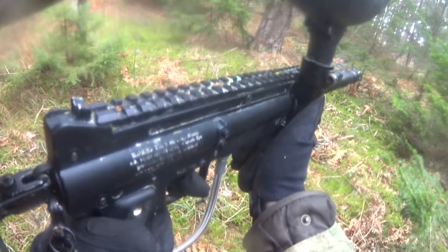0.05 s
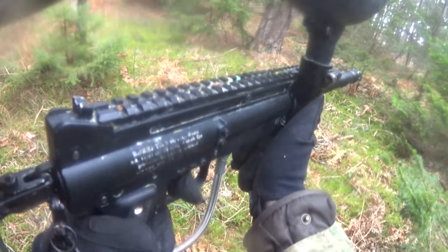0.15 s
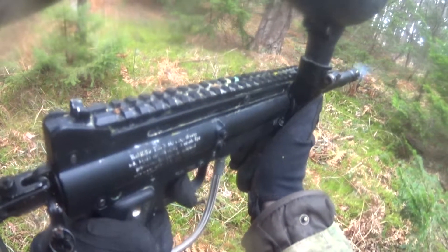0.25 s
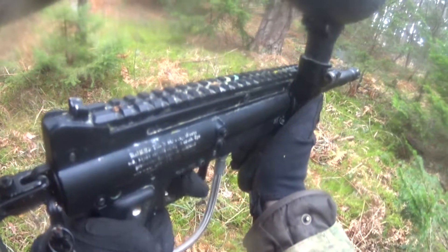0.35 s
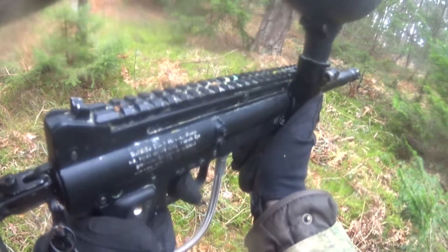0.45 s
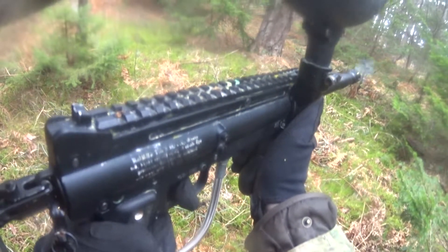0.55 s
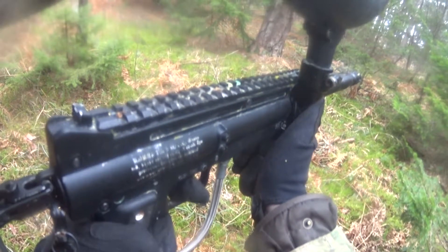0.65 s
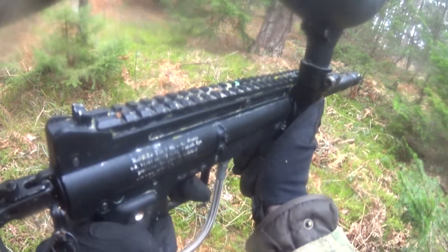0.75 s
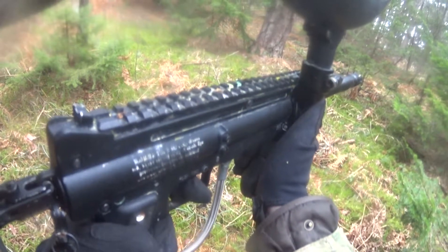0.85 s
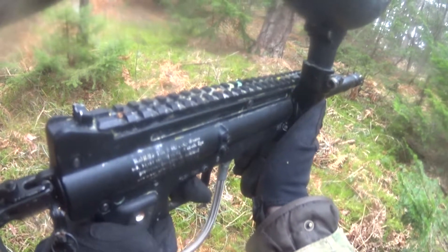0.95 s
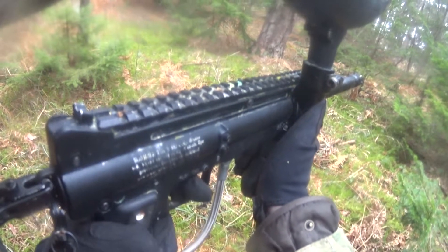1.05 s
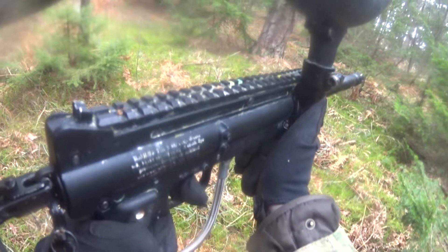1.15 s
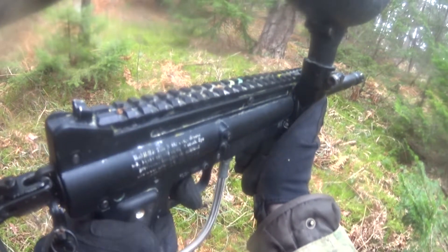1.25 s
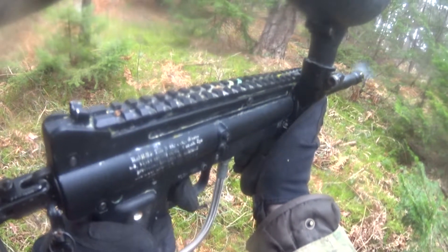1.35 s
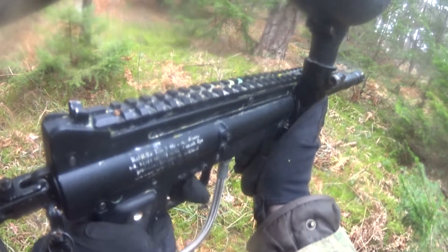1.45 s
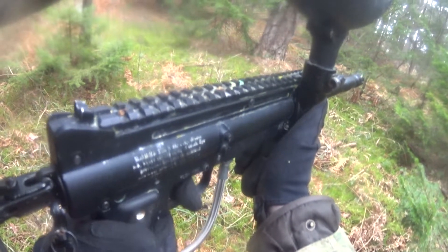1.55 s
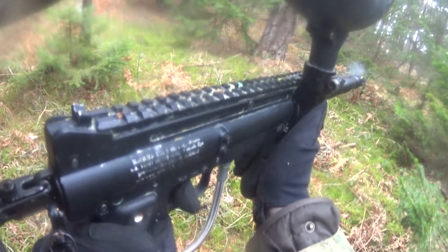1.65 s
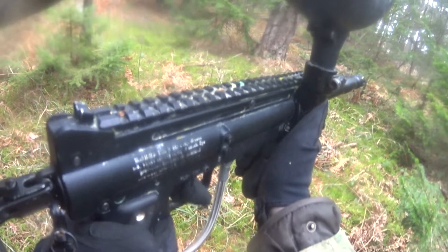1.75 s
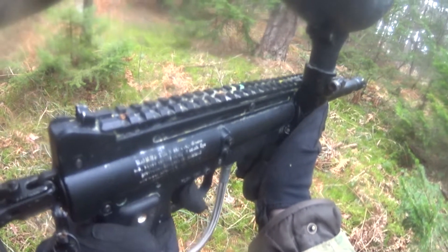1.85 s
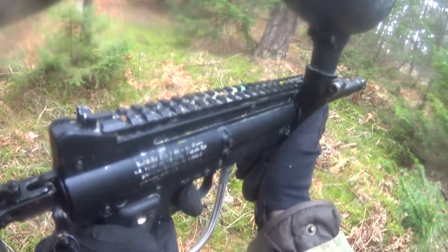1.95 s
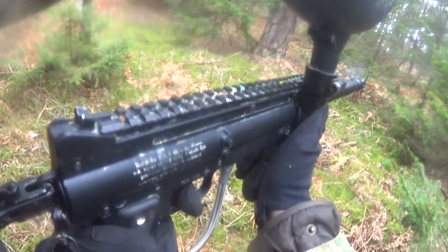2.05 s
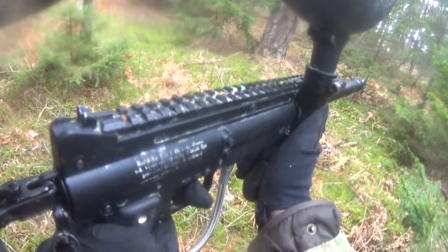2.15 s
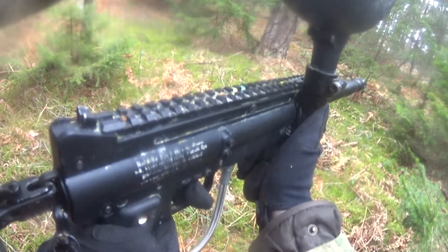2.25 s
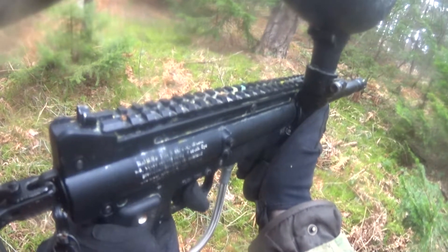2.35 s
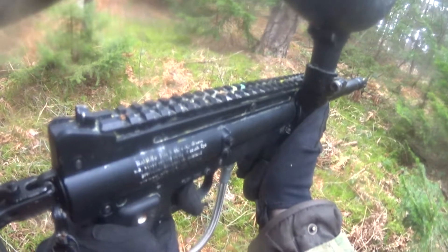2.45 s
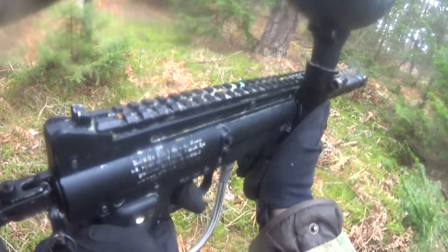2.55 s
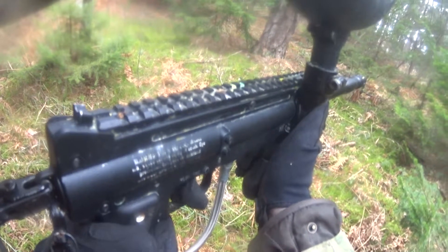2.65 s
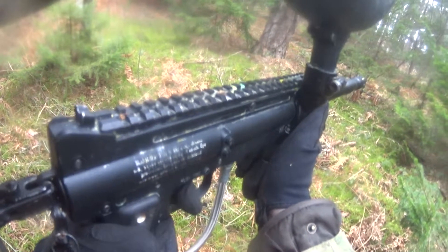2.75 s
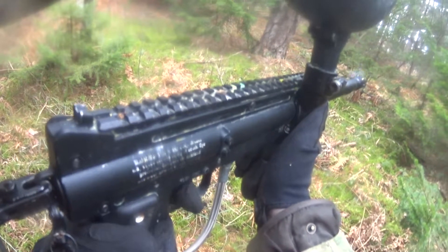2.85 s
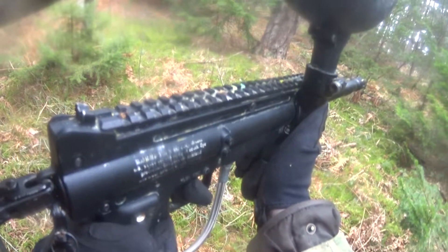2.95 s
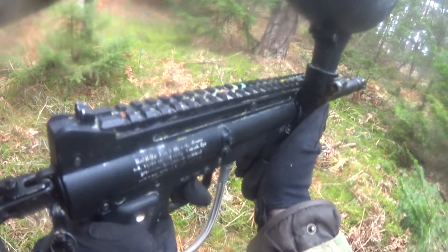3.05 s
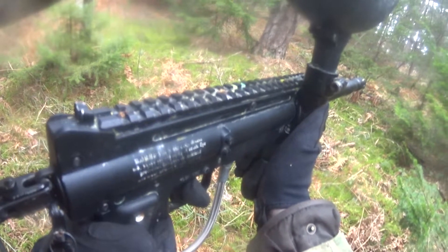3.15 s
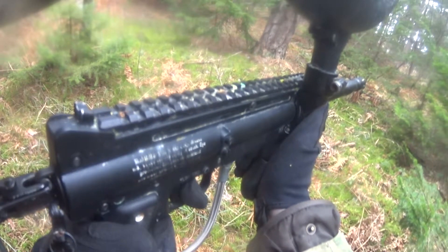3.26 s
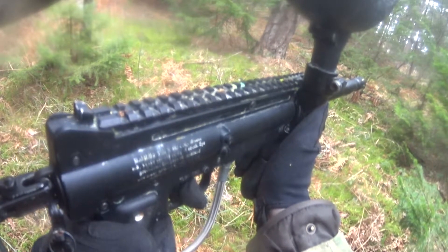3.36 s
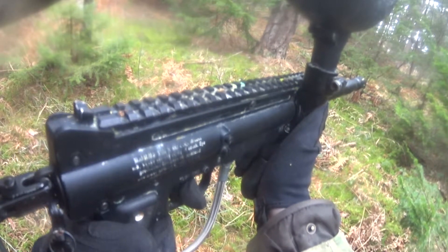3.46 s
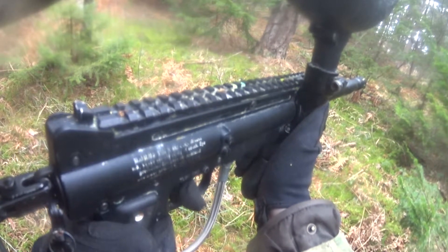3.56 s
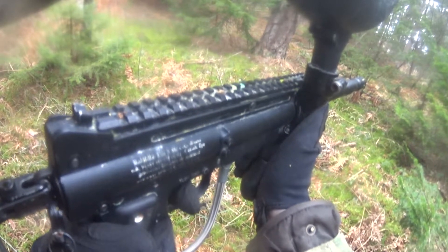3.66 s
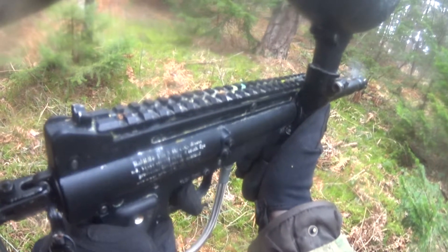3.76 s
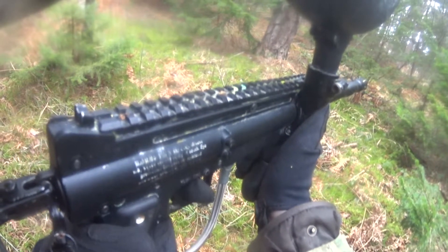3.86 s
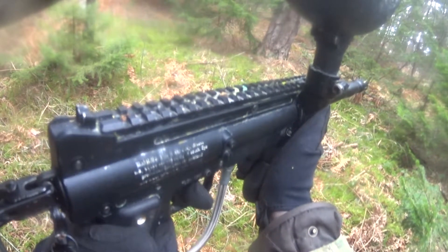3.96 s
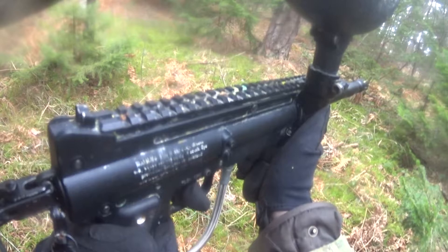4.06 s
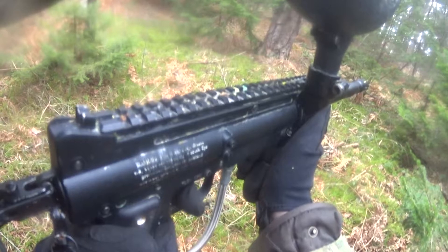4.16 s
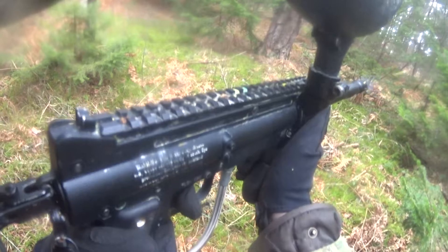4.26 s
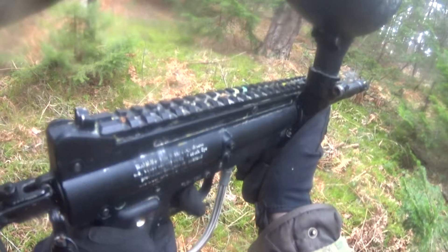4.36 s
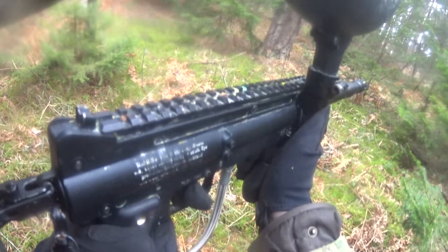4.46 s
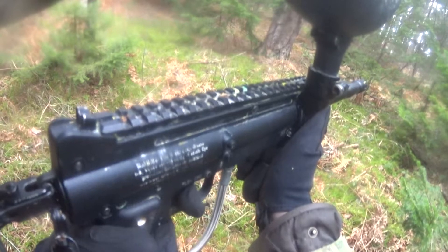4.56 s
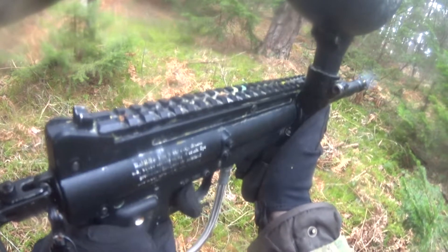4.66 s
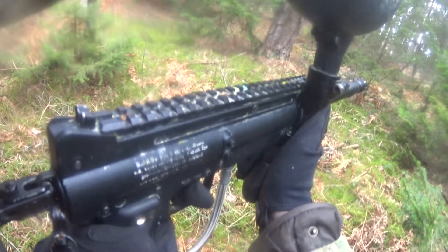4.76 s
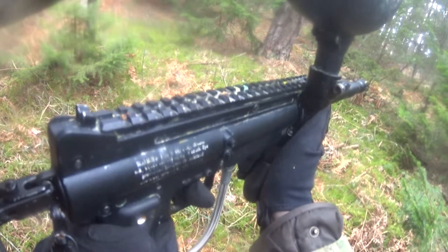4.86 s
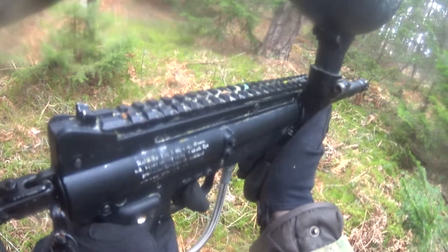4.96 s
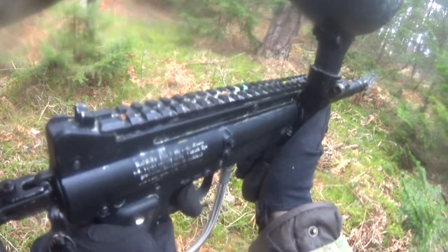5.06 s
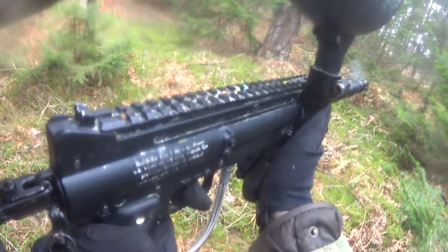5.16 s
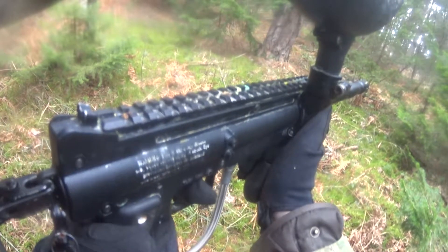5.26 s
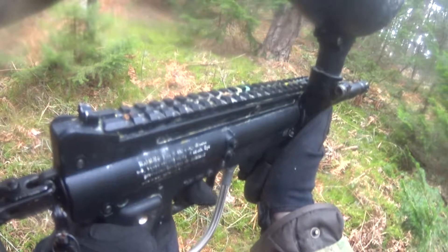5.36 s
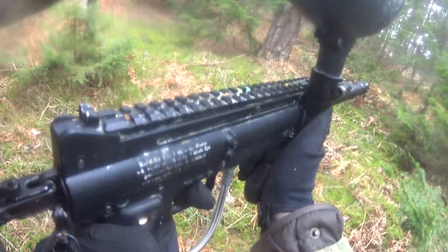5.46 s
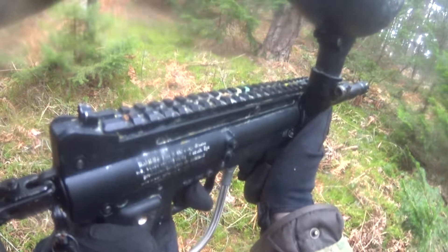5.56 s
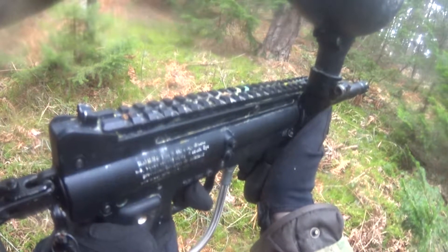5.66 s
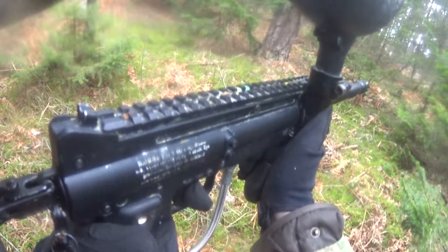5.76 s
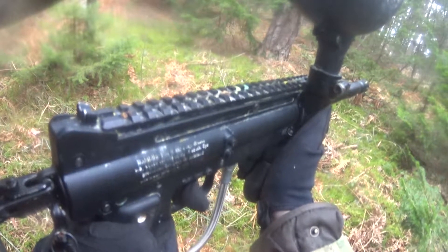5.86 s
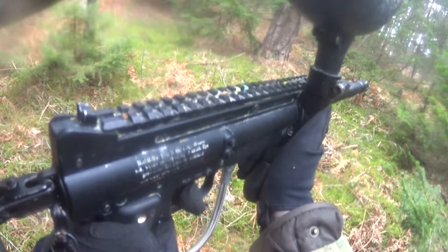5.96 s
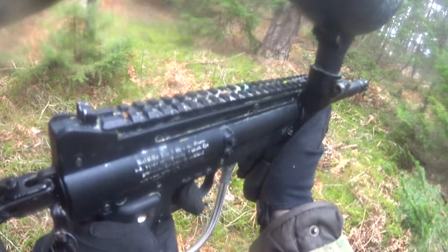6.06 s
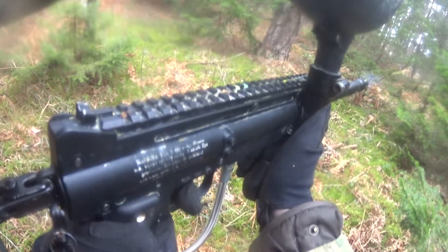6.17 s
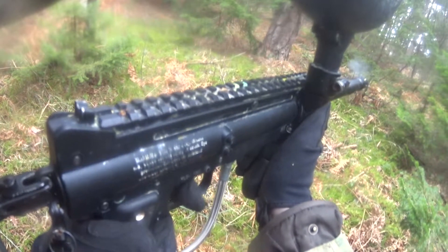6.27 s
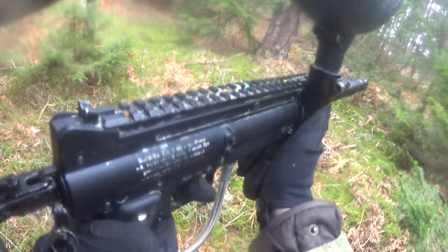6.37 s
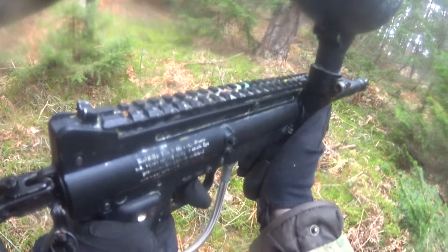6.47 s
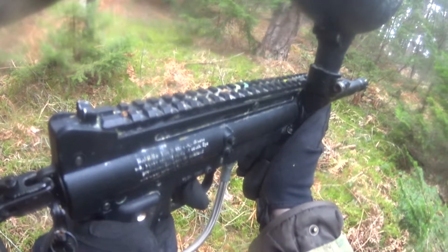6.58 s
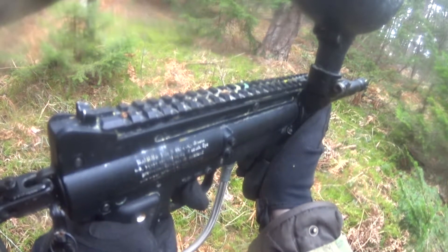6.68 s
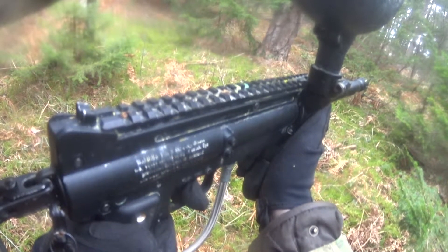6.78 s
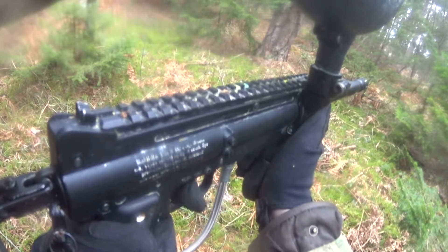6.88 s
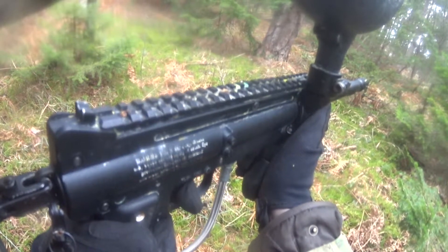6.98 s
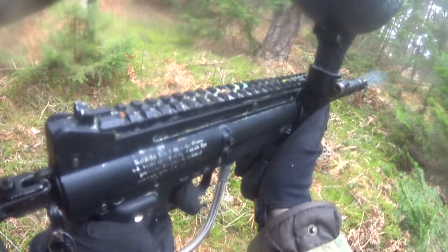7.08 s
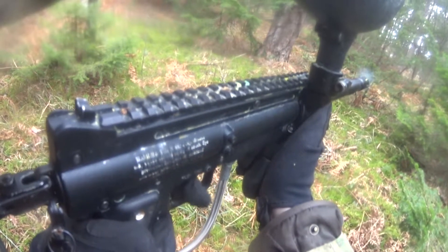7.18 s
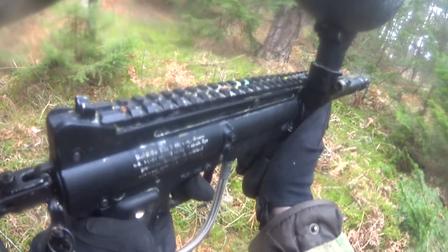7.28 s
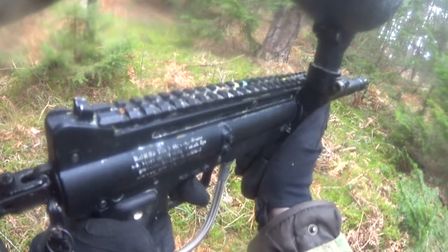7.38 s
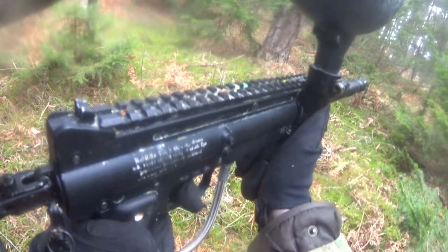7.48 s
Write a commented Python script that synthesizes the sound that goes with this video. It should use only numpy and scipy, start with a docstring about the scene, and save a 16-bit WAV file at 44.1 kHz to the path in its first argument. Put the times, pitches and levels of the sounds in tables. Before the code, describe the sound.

A paintball marker pops single shots right at the microphone, trigger snapping back, over distant rapid fire, paint smacks on trees and woodland echoes.

```python
"""Paintball marker in a forest

A marker is fired shot by shot right under a camera in a plastic housing: noise bursts for hammer, gas and
bolt, damped modes for struck parts and the booming housing; balls tumble in the feeder, the trigger snaps back.
A second marker some way off fires runs at 15 balls a second; paint smacks on trees, random-tap echoes
stand for the trunks, and coloured noise for the hush of the forest."""
import sys
import numpy as np
from scipy import signal
from scipy.fft import rfft, irfft
from scipy.io import wavfile

SR = 44100
rng = np.random.default_rng(int(sys.argv[2]) if len(sys.argv) > 2 else 0)


def bounce(signal):
    """Save signal as a 16-bit WAV file at the path given by the first command-line argument."""
    frames = np.transpose(np.atleast_2d(signal))
    limited = np.clip(frames, -1, 1)
    pcm = np.round(limited * 32767).astype(np.int16)
    wavfile.write(sys.argv[1], SR, pcm)


N = 331632

# shots of the near marker: start_s, strength_db, extra_gas_db
SHOTS = [(-.045, -9.5, 1.5), (0.2801, -12, -1), (0.5845, -13, -1), (1.3741, -12.5, 0), (1.6501, -13.5, .5),
         (2.0254, -11.5, -2), (2.5072, -13, 1), (2.8382, -12.5, 0.5), (3.716, -12.5, 2),
         (4.2953, -12, -0.5), (4.668, -11.5, 0.5), (5.0933, -11.5, 0.5), (6.2142, -12, 0.5),
         (7.1017, -11.5, 0)]
# trigger snapping back after each shot: start_s, level_db
RESETS = [(0.099, -8), (0.3969, -6.5), (0.7281, -7.5), (1.5248, -7), (1.775, -7.5), (2.1912, -6.5),
          (2.6586, -5.5), (2.97, -8), (3.873, -6.5), (4.4603, -6.5), (4.807, -6.5), (5.2457, -5),
          (6.3891, -4.5), (7.2715, -4)]
# colour of venting gas and of the far crack: freq_hz, density_db (per Hz, relative)
CRACK = [(60, -13.5), (600, 6), (950, -5), (2300, 3.5), (3500, -5), (5000, 1.5), (6700, -5.5), (10000, -14),
         (16000, -19.5)]
# colour of paint smacks and hard edges: freq_hz, density_db (per Hz, relative)
SMACK = [(100, -19.5), (650, -13.5), (1100, -16), (1900, 5), (3300, 3), (4500, 0.5), (6500, -1.5),
         (9000, -8), (16000, -22.5)]
# the two microphone ports: freq_hz, likeness (0-1), right_lag_rad, left_over_right_db
PORTS = [(100, 1, -1, -0.5), (350, .97, 0, -0.5), (704, 1, 0, 0.5), (1100, 0.73, 0, 3.5),
         (1500, 0.92, 0.2, 0.5), (2010, 0.99, -0.8, 0.7), (2580, 0.58, 1.5, 6), (3160, 0, -0.5, -1),
         (3850, 0.46, 0.46, 0), (4700, 1, 0.5, 1.5), (6600, 0.29, 0, 3), (8270, 0.33, -3, 2),
         (12100, 0.77, -2, -0.5)]


def amp(db):
    """Decibels to amplitude factor."""
    return 10 ** (np.asarray(db) / 20)


def evened(x):
    """Scales to rms 1."""
    return x / np.sqrt(np.mean(x ** 2) + 1e-20)


def read(table, hz, axis=1):
    """Interpolates one column of a table along log frequency."""
    columns = np.transpose(table)
    return np.interp(np.log(hz + 1), np.log(columns[0] + 1), columns[axis])


def add(mix, start_s, sound):
    """Adds a sound to the mix, cut off at both ends of the mix."""
    at = round(start_s * SR)
    sound = sound[..., max(-at, 0):]
    part = mix[:, max(at, 0):][:, :sound.shape[-1]]
    part += sound[..., :part.shape[1]]


def ports(a, b):
    """Blends two like sounds by band likeness, with the phase lag and level offset between the ports."""
    hz = np.fft.rfftfreq(len(a), 1 / SR)
    likeness = np.clip(read(PORTS, hz), 0, 1)
    side = amp(read(PORTS, hz, axis=3) / 2)
    lag = np.exp(-1j * read(PORTS, hz, axis=2))
    left = rfft(a)
    right = (likeness * left + np.sqrt(1 - likeness ** 2) * 1j * rfft(b)) * lag
    return irfft(np.array([left * side, right / side]), len(a))


def noise(colour, size):
    """Coloured stereo noise of rms 1."""
    white = ports(*rng.standard_normal((2, size)))
    gain = amp(read(colour, np.fft.rfftfreq(size, 1 / SR)))
    return evened(irfft(rfft(white) * gain, size))


def burst(colour, rise_s, hold_s, t60_s, tilt_db_oct=0, size=4096):
    """A rush of noise: linear rise, decay after the hold; the tilt brightens it per octave."""
    t = np.arange(size) / SR
    tilted = [(hz, db + tilt_db_oct * np.log2(hz)) for hz, db in colour]
    decay = amp(-60 * np.maximum(t - hold_s, 0) / t60_s)
    return noise(tilted, size) * np.minimum(t / rise_s, 1) * decay


def ring(modes, spread, size=3072):
    """Damped modes after one blow, with a relative frequency spread from blow to blow."""
    t = np.arange(size) / SR
    out = np.zeros(size)
    for hz, db, t60_s in modes:
        detuned_hz = hz * (1 + spread * rng.standard_normal())
        out += amp(db - 60 * t / t60_s) * np.sin(2 * np.pi * detuned_hz * t)
    return out


def struck(modes, spread, size=4096):
    """Damped modes of a struck hard part; where the blow lands sets each mode's sign, drawn by chance."""
    hz, db, t60_s = np.transpose(modes)[:, :, None]
    t = np.arange(size) / SR
    detuned_hz = hz * (1 + spread * rng.standard_normal(hz.shape))
    tones = amp(db - 60 * t / t60_s) * np.sin(2 * np.pi * detuned_hz * t)
    signs = rng.choice([-1, 1], (2, len(hz)))
    return ports(*signs @ tones) * np.linspace(1, 0, size)


def boom(modes, push_s, spread, size=256):
    """A push of air and the suction behind it excite booming modes."""
    u = np.minimum(np.arange(size) / (push_s * SR), 1)
    push = np.sin(2 * np.pi * u) * np.sin(np.pi * u)
    return np.convolve(ring(modes, spread), push / abs(push).sum())


def sputter(x, depth_db, grain_s):
    """Gas leaves in uneven spurts: a random level, interpolated between grains."""
    t = np.arange(x.shape[-1]) / SR
    level_db = depth_db * np.interp(t / grain_s, np.arange(256), rng.standard_normal(256))
    return x * evened(amp(level_db))


def marker():
    """Hammer, bolt slide, gas at the muzzle, thump and rebound, recocking, then a hiss of venting gas."""
    # colours of the hammer and the gas: freq_hz, density_db (per Hz, relative)
    hammer_colour = [(60, -30), (300, -15), (600, 3.5), (950, -31), (1400, -11), (1800, -11), (3000, -1),
                     (6000, 1), (9000, 0.5), (12000, -6), (16000, -13.5)]
    gas_colour = [(60, -16.5), (600, 12), (950, -8), (1700, 5), (3200, 1), (5500, 1), (9000, -1.5),
                  (11000, 2.5), (16000, -8)]
    # short steel clack of the hammer: freq_hz, level_db, t60_s
    clack_modes = [(1733, -13, 0.08), (2370, -8, 0.052), (3510, 0.5, 0.025), (4330, -17, 0.024),
                   (4700, -1, 0.012), (4930, -1, 0.014), (5590, 1, 0.017), (6330, 7, 0.0083),
                   (6770, -2, 0.0081), (10630, 7.5, 0.014), (14800, -1, .018)]
    # metal receiver ringing on after the bolt slams home: freq_hz, level_db, t60_s
    receiver_modes = [(1087, -5.5, 0.26), (1148, -13.5, 0.43), (1320, -18, 0.13), (1672, 0.5, 0.113),
                      (2250, 6, 0.032), (2864, 4.5, 0.1), (3030, -5.5, 0.41), (3458, 6, 0.046),
                      (4330, 5.5, 0.057), (4430, 0.5, 0.035), (5650, -21, 0.049), (7530, -1, 0.2)]
    # camera housing booming from the muzzle's push: freq_hz, level_db, t60_s
    housing_modes = [(157, -5.5, 0.04), (225, -9, 0.034), (375, -17, 0.045), (450, -7.5, 0.033),
                     (616, -10.5, 0.025), (683, -1, 0.036), (736, -5.5, 0.027)]
    # delays after the hammer falls
    slide_s, gas_s, thump_s, rebound_s, recock_s, vent_s = .008, .0192, .0218, .0262, .0345, .042
    # levels against the shot's strength
    hammer_db, clack_db, slide_db, gas_db, thump_db = -4, -7, -13.5, -2.5, 5
    rebound_db, recock_db, receiver_db, vent_db = -5, -2.5, -16.5, -16
    out = np.zeros((2, N))
    for s, db, extra_db in SHOTS:
        hammer = burst(hammer_colour, rise_s=0.00063, hold_s=0.0043, t60_s=0.015)
        add(out, s, amp(db + hammer_db) * hammer)
        add(out, s + .0003, amp(db + clack_db) * struck(clack_modes, spread=0.014))
        slide = burst(gas_colour, rise_s=0.0045, hold_s=0.0094, t60_s=0.042)
        add(out, s + slide_s, amp(db + slide_db) * slide)  # the bolt slides forward
        gas = burst(gas_colour, rise_s=0.0019, hold_s=0.0078, t60_s=0.061)
        gas = sputter(gas, depth_db=2.5, grain_s=0.001507)
        add(out, s + gas_s, amp(db + extra_db + gas_db) * gas)
        thump = -boom(housing_modes, push_s=0.0024, spread=0.0094)
        add(out, s + thump_s, amp(db + thump_db) * thump)
        add(out, s + rebound_s, amp(db + rebound_db) * thump)  # thrown back by the shooter's body
        recock_at = s + recock_s + .0005 * rng.standard_normal()
        recock = burst(hammer_colour, rise_s=0.00027, hold_s=0.0019, t60_s=0.014)
        add(out, recock_at, amp(db + recock_db) * recock)
        add(out, recock_at, amp(db + receiver_db) * struck(receiver_modes, spread=0.0035, size=8192))
        vent = burst(CRACK, rise_s=0.017, hold_s=0.024, t60_s=0.24, size=12000)
        vent = sputter(vent, depth_db=4.5, grain_s=0.0034)
        add(out, s + vent_s, amp(db + extra_db + vent_db) * vent)
    return out


def air():
    """The hush of the forest, hollow in the housing: coloured noise of slowly changing level."""
    # colour of the hush: freq_hz, density_db (per Hz, relative)
    air_colour = [(15, -46.5), (25, -24.5), (175, -15), (195, -13.5), (326, -13), (439, -12.5), (516, -5.5),
                  (790, -9), (911, -28.5), (1290, -21), (2610, -27), (6210, -37), (6920, -30.5),
                  (7920, -39), (16000, -41)]
    # level of the hush: time_s, level_db
    air_levels = [(4.5, -45), (5.3, -44), (5.9, -46), (6.9, -43.5), (7.5, -46.5)]
    level_db = np.interp(np.arange(N) / SR, *np.transpose(air_levels))
    return noise(air_colour, N) * amp(level_db)


def scatter(x, bands, onset_s, per_s, size=65536):
    """Echoes from many trunks: sparse taps of uneven size, each band dying at its own speed."""
    taps = rng.standard_normal((2, size)) * (rng.random((2, size)) < per_s / SR)
    hz, t, z = signal.stft(taps, SR, nperseg=256)
    likeness = np.clip(read(PORTS, hz), 0, 1)[:, None]
    z[1] = likeness * z[0] + np.sqrt(1 - likeness ** 2) * z[1]
    fade = amp(-60 * t / read(bands, hz, axis=2)[:, None]) * np.minimum(t / onset_s, 1)
    fade *= amp(read(bands, hz))[:, None] / np.sqrt(np.mean(fade ** 2, 1, keepdims=True))
    tail = signal.istft(z * fade, SR, nperseg=256)[1] / np.linalg.norm(taps[0])
    return signal.fftconvolve(x, tail, axes=1)[:, :N]


def feeder():
    """Each shot turns the feeder: a rustle of tumbling balls, small knocks of changing pitch, and single hard ones."""
    # colour of the rustle: freq_hz, density_db (per Hz, relative)
    rustle_colour = [(60, -20.5), (250, -1), (450, 4.5), (700, 10), (930, -27), (1150, -1.5), (1800, 3),
                     (2800, -9.5), (5000, -16), (9000, -8.5), (16000, -49)]
    # ball on the feeder's plastic wall: freq_hz, level_db, t60_s
    wall_modes = [(527, -2.5, 0.03), (1145, -7, 0.059), (1768, 0, 0.031), (2290, -5, 0.023)]
    # single hard knocks: start_s, level_db
    knocks = [(.049, -29), (2.1676, -22.5), (2.936, -27), (3.083, -27), (4.3726, -21.5), (4.406, -20),
              (5.207, -23), (5.228, -24.5), (6.346, -39)]
    rustle_db, held_share = -30, .89  # share of the time from hammer to trigger reset
    tumble_db, tumble_range_db = -34.5, 11.5
    out, t = np.zeros((2, N)), np.arange(16384) / SR
    for (s, _, _), (back_s, _) in zip(SHOTS, RESETS):
        run_s = held_share * (back_s - s)
        decay = amp(-25 * t - 60 * np.maximum(t - run_s, 0) / 0.051)
        turning = np.clip((t - .03) / 0.015, 0, 1) * decay
        add(out, s, amp(rustle_db) * turning * noise(rustle_colour, len(t)))
        for when, hardness in rng.random((9, 2)):
            knock = struck(wall_modes, spread=0.081, size=1536)
            add(out, s + .045 + when * (run_s - .04), amp(tumble_db + tumble_range_db * hardness) * knock)
    for s, db in knocks:
        add(out, s, amp(db) * burst(rustle_colour, rise_s=0.00086, hold_s=0.0026, t60_s=0.046))
        edge = burst(SMACK, rise_s=.0007, hold_s=.002, t60_s=.025)
        add(out, s, amp(db - 8) * edge)
    return out


def trigger():
    """The trigger snaps back: a tiny bright noise snap, a fainter rattle, and the spring's damped ping."""
    # colour of the snap: freq_hz, density_db (per Hz, relative)
    snap_colour = [(60, -17), (300, -19), (550, -18), (950, -28), (2200, -35), (2800, -5), (3400, -21),
                   (4400, 2), (7000, 5.5), (9400, -5), (11000, 19), (13000, -4), (16000, 1)]
    # trigger spring: freq_hz, level_db, t60_s
    spring_modes = [(2795, 0, 0.043), (4540, 5, 0.014), (6430, 11, 0.0044), (7680, -5, 0.026),
                    (10200, 2.5, .035), (11160, 22, 0.0063), (13200, 23.5, 0.0033)]
    out = np.zeros((2, N))
    for s, db in RESETS:
        snap = burst(snap_colour, rise_s=.0001, hold_s=.0004, t60_s=.0035)
        rattle = burst(snap_colour, rise_s=0.0015, hold_s=0.0017, t60_s=0.015)
        add(out, s + .0009, amp(db) * snap + amp(db - 18.5) * rattle)
        ping_db = db - 22.5 + 2.2 * rng.standard_normal()
        add(out, s + .001, amp(ping_db) * struck(spring_modes, spread=0.0048))
    return out


def rapid_fire():
    """Time and level of each far shot: a steady beat within a run, its first gap a little longer."""
    # runs of fire: start_s, shot_count, level_db
    runs = [(.1432, 1, -25.5), (.2734, 1, -24.5), (.432, 44, -27), (3.4342, 2, -25), (3.6023, 2, -24.5),
            (3.904, 2, -23.5), (4.0493, 1, -24), (4.1082, 1, -25.5), (4.1835, 2, -24)]
    gap_s, first_lag_s, uneven_db = .0666, .0032, 1.63
    shots = []
    for start_s, count, db in runs:
        for k in range(round(count)):
            shot_s = start_s + k * gap_s + first_lag_s * (k > 0)
            shots.append((shot_s, db + uneven_db * rng.standard_normal()))
    return shots


def second_marker(shots):
    """Fire from further off: booming thump, noise crack, and the bolt's clinks going and coming back."""
    # thinner thump of the second marker: freq_hz, level_db, t60_s
    thump_modes = [(111, -4.5, 0.041), (279, -19.5, 0.048), (479, -19, 0.068), (649, 1.5, 0.025)]
    # bolt clink: freq_hz, level_db, t60_s
    clink_modes = [(2260, -2.5, 0.028), (4620, 0.5, 0.021), (5210, -1.5, 0.019), (5560, -3, 0.016),
                   (10700, -6.5, 0.021)]
    out = np.zeros((2, N))
    for s, db in shots:
        add(out, s + 0.00029, amp(db + 7.0) * boom(thump_modes, push_s=0.0022, spread=0.023))
        crack = burst(CRACK, rise_s=0.00062, hold_s=0.0019, t60_s=0.021, size=2048)
        add(out, s + .0005, amp(db - 3.5) * crack)
        add(out, s + 0.0032, amp(db - 8) * struck(clink_modes, spread=0.0316, size=2048))
        add(out, s + 0.011, amp(db - 11.0) * struck(clink_modes, spread=.04, size=2048))
    return out


def paint(shots):
    """Balls burst on trees and the wood knocks; far balls land as ticks after flights of chance length."""
    # single smacks of paint on wood: start_s, level_db, tilt_db_oct
    smacks = [(1.253, -22.5, 0), (2.21, -23.5, 1.5), (2.226, -24.5, -3.5), (3.0093, -30.5, 1),
              (3.108, -29, 3), (3.545, -28, 11.5), (3.8678, -18.5, -5), (4.119, -27, -2),
              (4.929, -35.5, 0.5), (5.5611, -30, -2), (6.6017, -29, -1.5)]
    # wood knocking under the paint: freq_hz, level_db, t60_s
    wood_modes = [(1873, 0.5, 0.02), (3110, -3.5, 0.026), (3450, -1, 0.0236), (4270, -4, 0.0245)]
    flight_s, flight_range_s = 0.11, .23
    landing_db, landing_range_db = -49, 23.5
    out = np.zeros((2, N))
    for s, db, tilt in smacks:
        smack = burst(SMACK, rise_s=0.0004, hold_s=0.00089, t60_s=0.029, tilt_db_oct=tilt, size=2048)
        add(out, s, amp(db) * smack)
        add(out, s, amp(db - 3.5) * struck(wood_modes, spread=0.018, size=2048))
    for (s, _), (flight, hardness, dullness) in zip(shots, rng.random((len(shots), 3))):
        tick = burst(SMACK, rise_s=0.0011, hold_s=0.0015, t60_s=0.035, tilt_db_oct=-3 * dullness, size=2048)
        tick_db = landing_db + landing_range_db * hardness ** 2  # squared: most land faintly
        add(out, s + flight_s + flight_range_s * flight, amp(tick_db) * tick)
    return out


def hand():
    """Low noise bumps as the grip shifts on the marker."""
    # bumps: start_s, level_db
    bumps = [(5.135, -29), (5.42, -41.5), (5.444, -43), (5.565, -45), (6.603, -47.5)]
    # colour of a bump: freq_hz, density_db (per Hz, relative)
    bump_colour = [(30, -20), (100, 8), (160, 2), (300, -26), (1000, -45), (16000, -80)]
    out = np.zeros((2, N))
    for s, db in bumps:
        add(out, s, amp(db) * burst(bump_colour, rise_s=0.0037, hold_s=0.0075, t60_s=0.08))
    return out


def scene():
    """The marker close by, the far sounds, and the forest's answer to both."""
    # scatter from near trunks and from the deep forest: freq_hz, level_db, t60_s
    trunk_bands = [(80, -12, 0.31), (397, -15.5, 0.7), (697, -10.5, 0.2), (1100, -4.5, 0.061),
                   (2000, -6.5, 0.39), (5300, -10.5, 0.39), (8500, -7.5, 0.25), (14900, -15, 0.28)]
    forest_bands = [(80, -42, 0.98), (600, -16, 1.7), (1100, -12, 1.06), (1720, -15, 2), (2340, -23, 1.16),
                    (5000, -22, 0.89), (8950, -18.5, 0.63), (15000, -27, 0.58)]
    far_shots = rapid_fire()
    near, far, hits = marker(), second_marker(far_shots), paint(far_shots)
    handling = trigger() + feeder() + hand()
    trunks = scatter(near, trunk_bands, onset_s=0.031, per_s=1100)
    far_trunks = scatter(amp(4.0) * far + amp(4.5) * hits, trunk_bands, onset_s=0.015, per_s=380)
    to_forest = near + amp(12.5) * far + amp(12.5) * hits
    forest = scatter(to_forest, forest_bands, onset_s=0.038, per_s=1500)
    return near + far + hits + handling + trunks + far_trunks + forest + air()


def record(dry):
    """Rounds off the highest peaks, then limits the band with a linear-phase low-pass."""
    edge_hz, ceiling = 16200, .85
    rounded = dry / (1 + (dry / ceiling) ** 6) ** (1 / 6)
    low_pass = signal.firwin(301, edge_hz, window=("kaiser", 7), fs=SR)
    return signal.oaconvolve(rounded, low_pass[None], "same")


dry = scene()
out = record(dry)
bounce(out)
```